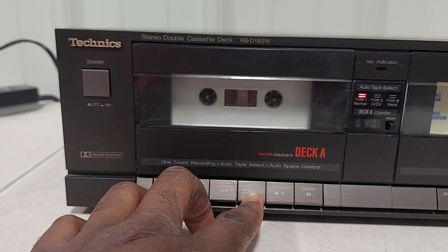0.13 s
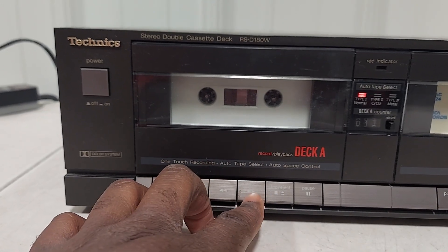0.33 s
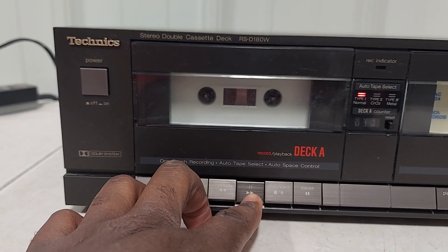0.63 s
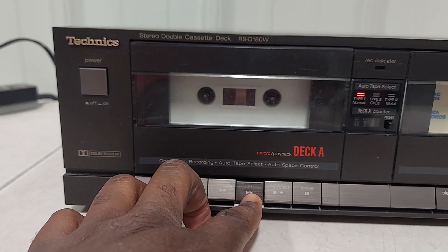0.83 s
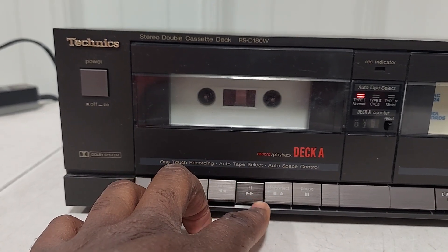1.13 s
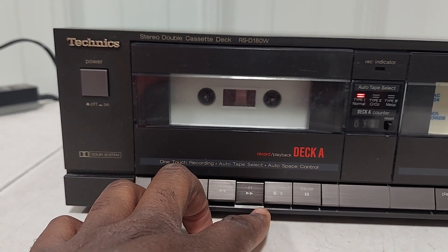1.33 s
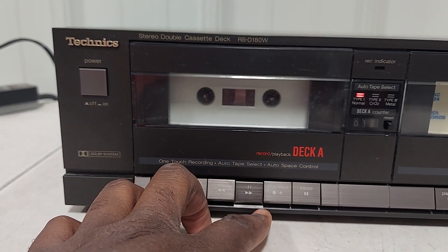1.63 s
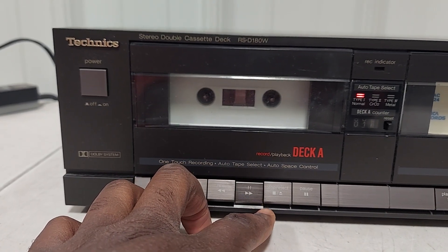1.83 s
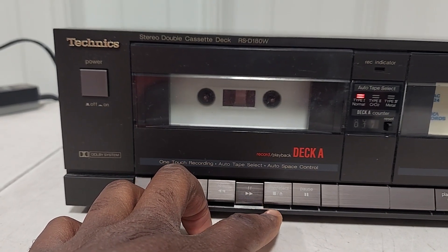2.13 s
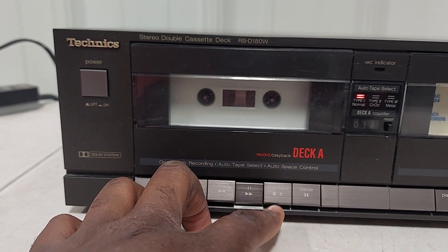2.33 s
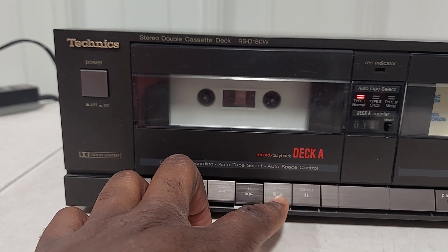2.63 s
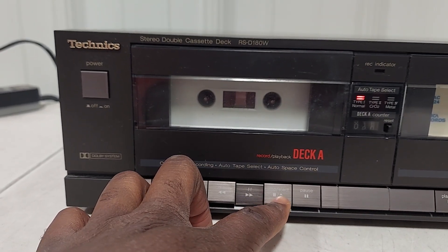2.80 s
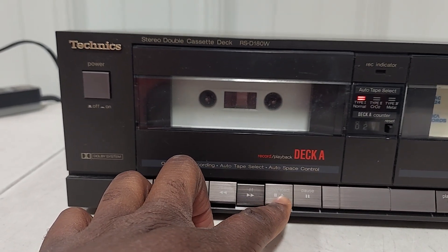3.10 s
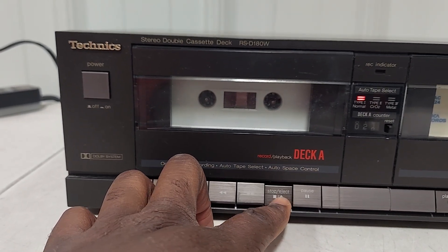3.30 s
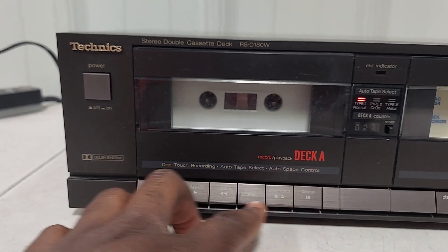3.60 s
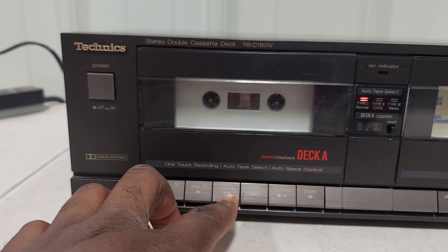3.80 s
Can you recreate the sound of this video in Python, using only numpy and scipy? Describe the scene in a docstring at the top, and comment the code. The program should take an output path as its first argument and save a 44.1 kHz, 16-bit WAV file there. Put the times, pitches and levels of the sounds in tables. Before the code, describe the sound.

A cassette deck on a table, heard close in a small room. Faint rumble and hum until clustered plastic key clicks at 0.5-0.72 s. From 0.65 s gears whir low and grainy, fluttering about seven times a second, with faint tape hiss; a small tick at 2.4 s. At 3.33 s a loud sharp latch crack stops it; a softer spring-back clack at 3.52 s, then finger rubbing until 3.8 s.

```python
"""On a table in a small room, a cassette deck is worked close to a two-port microphone.
A finger pushes the wind key, heard as short noise cracks with ringing parts; the stop key trips the latch
with a sharp crack and springs back. In between, gears whir as wavering tones, with chassis rattle and
tape hiss made of shaped noise. The room answers the clicks with a decaying noise echo.
Underneath lie low rumble, mains hum, a finger sliding over the keys and microphone hiss."""
import sys
import numpy as np
from scipy import signal
from scipy.fft import rfft, irfft, next_fast_len
from scipy.io import wavfile
from scipy.ndimage import map_coordinates

SR = 44100
rng = np.random.default_rng(int(sys.argv[2]) if len(sys.argv) > 2 else 0)


def master_out(mix):
    """Clip the mix to full scale and print it as 16-bit PCM to the path in sys.argv[1]."""
    frames = np.transpose(np.atleast_2d(mix))
    ceiling = np.clip(frames, -1, 1)
    pcm = np.round(ceiling * 32767).astype(np.int16)
    wavfile.write(sys.argv[1], SR, pcm)


def decibels_to_gain(level_db):
    """Convert a level in decibels to a linear amplitude gain (20 dB per decade)."""
    exponent = np.asarray(level_db, float) / 20
    return 10 ** exponent


N = 174195
T = np.arange(N) / SR


def unit(x):
    """Scale to rms 1."""
    return x / np.sqrt(np.mean(x ** 2) + 1e-20)


def along(points, hz):
    """Read a value between (frequency, value) points on a log frequency axis."""
    f, value = np.transpose(points)
    return np.interp(np.log(hz + 1), np.log(f + 1), value)


def closed(points):
    """Gain of a noise spectrum, silent well outside its end points."""
    return lambda hz: decibels_to_gain(along(points, hz)) * (hz >= points[0][0] / 2) * (hz <= points[-1][0] + 100)


def curve(rows):
    """Turn (time, value) rows into one value per sample."""
    return np.interp(T, *np.transpose(rows))


def wobble(rate):
    """A smooth random curve through `rate` random values a second."""
    knots = rng.standard_normal(int(N * rate / SR) + 4)
    return map_coordinates(knots, [T * rate])


def filtered(x, response):
    """Multiply the spectrum of x by a gain that depends on frequency."""
    size = next_fast_len(x.shape[-1] + 8192)
    spectrum = rfft(x, size) * response(np.fft.rfftfreq(size, 1 / SR))
    return irfft(spectrum, size)[..., :x.shape[-1]]


def peaks(table):
    """Gain of steep resonances: each is applied three times, then their powers add."""
    def power(f, center, width, db):
        once = (f * width) ** 2 / ((center * center - f * f) ** 2 + (f * width) ** 2)
        return decibels_to_gain(2 * db) * once ** 3
    return lambda f: np.sqrt(sum(power(f, *row) for row in table))


# How alike left and right are: (frequency [Hz], likeness [-1 to 1])
LIKENESS = [(60, 0.95), (180, 0.95), (550, 0.73), (1650, -0.031), (4970, -0.1), (15000, 0.096)]


def noise(gain, size=N):
    """Stereo noise of rms 1, alike in the bass and nearly unrelated in the treble."""
    def spread(hz):
        angle = np.arccos(np.clip(along(LIKENESS, hz), -1, 1)) / 2
        return gain(hz) * np.array([np.cos(angle), np.sin(angle)])
    mid, side = filtered(rng.standard_normal((2, size)), spread)
    return unit(np.array([mid + side, mid - side]))


def ring(modes, t):
    """Struck parts ring as fading sines; the two ports part in phase towards the treble."""
    out = 0
    for hz, db, t60 in modes:
        level = decibels_to_gain(db + rng.normal(0, 3.1) - 60 * t / t60)
        phase = rng.normal(0, hz / 3000, (2, 1))
        out = out + level * np.sin(2 * np.pi * hz * t + phase)
    return out


def chatter(size):
    """Loose parts tick unevenly inside a contact: a spiky gain of rms 1, each tick dying in a few ms."""
    ticks_per_s, tick_spread_db = 1100, 5.5
    ticks = (rng.random(size) < ticks_per_s / SR) * decibels_to_gain(tick_spread_db * rng.standard_normal(size))
    return unit(0.5 + signal.lfilter([1], [1, -0.975], ticks))


# Contacts in the key linkage: (time [s], level [dB], build-up [s], time to fade 60 dB [s],
# body thud over the crack [dB], top frequency of crack and panel [Hz])
CONTACTS = [(0.519, -69.5, 0.0012, 0.31, 8, 2930), (0.649, -44, 0.0053, 0.11, -21, 15600),
            (0.655, -38.5, .002, 0.076, 2, 15100), (0.664, -39, 0.0031, 0.058, 5.5, 14300),
            (.704, -40.5, 0.0019, 0.039, -3, 8100), (0.7185, -31.5, 0.00078, 0.049, -2, 14800),
            (2.403, -48.5, 0.003, 0.061, 5.5, 8350), (2.466, -68, 0.0021, .03, -10, 6000),
            (3.252, -59.5, .003, 0.052, -8.5, 7020), (3.3252, -27.5, 0.00062, 0.042, -4, 14870),
            (3.3296, -10.5, .0015, 0.048, -7, 16000), (3.338, -29, 0.0019, 0.051, -5, 6070),
            (3.347, -32.5, .002, 0.14, -1.5, 6870), (3.514, -39, .004, 0.091, -22, 7850),
            (3.519, -28.5, 0.0037, 0.038, -2.5, 11780), (3.945, -59, 0.0036, 0.046, -12, 2920)]
# Colour of the crack: (frequency [Hz], relative level [dB per Hz])
CRACK_COLOUR = [(300, -28.5), (700, -10.5), (2300, -10.5), (3000, -12), (4800, -16), (5500, -10.5),
                (6700, -14.5), (9500, -15), (11000, -18), (12300, -10), (14500, -14), (16700, -32.5)]
# Ringing front panel and levers: (frequency [Hz], relative level [dB], time to fade 60 dB [s])
PANEL_MODES = [(1671, -8.5, 0.069), (1937, -13.5, 0.075), (2329, -14, 0.12), (2756, -12, 0.12),
               (2950, -11.5, 0.097), (5600, -2, 0.012), (7300, -8, 0.047), (7620, -7.5, 0.031),
               (12300, -4.5, 0.04)]
# Ringing case of the deck: (frequency [Hz], relative level [dB], time to fade 60 dB [s])
CASE_MODES = [(543.6, -17.5, 0.22), (672.3, 1, 0.052), (910, -3.5, 0.053), (989, -17.5, 0.18)]


def add_contacts(out, t):
    """Each contact builds up as a grainy scrape, cracks, and rings the panel and the case."""
    size, panel_db = len(t), -8
    for at, db, rise, t60, thud_db, top_hz in CONTACTS:
        late, up = np.clip(t - rise, 0, None), np.clip(t / rise, 0, 1)
        crack = up ** 0.39 * decibels_to_gain(-60 * late / t60) * chatter(size) * noise(closed(CRACK_COLOUR), size)
        panel = decibels_to_gain(panel_db) * (late > 0) * ring(PANEL_MODES, late)
        bright = filtered(crack + panel, lambda hz: 1 / np.sqrt(1 + (hz / top_hz) ** 6))
        thud = decibels_to_gain(thud_db) * up * ring(CASE_MODES, t)
        # the scrape starts early, so that the crack lands on time
        out[:, round((at - rise) * SR):][:, :size] += decibels_to_gain(db) * (bright + thud)


# Table thumps under the key presses: (time [s], level [dB], lowest frequency stirred [Hz])
THUMP_TIMES = [(0.664, -35, 257), (.722, -41, 97), (3.332, -33.5, 101), (3.522, -35, 60),
               (3.612, -48.5, 69.9)]
# Ringing table top: (frequency [Hz], relative level [dB], time to fade 60 dB [s])
TABLE_MODES = [(81.3, -6, .3), (134.7, -2.5, .35), (219.3, -5.5, 0.35), (272.8, -3.5, 0.2),
               (372.3, -9.5, .25), (476.3, -9.5, 0.11)]


def add_thumps(out, t):
    """A press rings the table and makes it shudder as noise around the same frequencies."""
    size = len(t)
    blurred = peaks([(hz, 60, level) for hz, level, _ in TABLE_MODES])
    for at, db, low_hz in THUMP_TIMES:
        shudder = decibels_to_gain(-2 - 60 * t / 0.39) * noise(blurred, size)
        thump = filtered(ring(TABLE_MODES, t) + shudder, lambda hz: hz ** 4 / (hz ** 4 + low_hz ** 4))
        soft_start = 1 - np.exp(-t / 0.006)
        out[:, round(at * SR):][:, :size] += decibels_to_gain(db) * soft_start * thump


# Return spring of the key: (frequency [Hz], level [dB], time to fade 60 dB [s])
SPRING_MODES = [(584, -46, 0.28)]


def add_spring(out, t):
    """The key's return spring sings after release, as a fading tone."""
    spring_s, rise_s = 3.545, 0.016
    out[:, round(spring_s * SR):][:, :len(t)] += np.clip(t / rise_s, 0, 1) * ring(SPRING_MODES, t)


def keys():
    """The keys knock part on part, thump the table and spring back."""
    out = np.zeros((2, N + SR))
    t = np.arange(SR // 3) / SR
    add_contacts(out, t)
    add_thumps(out, t)
    add_spring(out, t)
    return out[:, :N]


# How fast the room's answer dies: (frequency [Hz], time to fade 60 dB [s])
ROOM_DECAY = [(300, 0.13), (3000, 0.6), (7000, 0.43), (14000, 0.29)]


def room(x):
    """The room answers with noise in which each frequency dies at its own speed."""
    room_db = -16.5
    _, t, grid = signal.stft(rng.standard_normal((2, SR // 2)), SR, nperseg=256)
    hz = np.fft.rfftfreq(256, 1 / SR)
    fade = decibels_to_gain(-60 * t / along(ROOM_DECAY, hz)[:, None])
    tail = signal.istft(grid * fade, SR, nperseg=256)[1]
    tail = tail / np.linalg.norm(tail[0])
    delayed = np.pad(x, ((0, 0), (300, 0)))  # 300 samples, about 7 ms
    return decibels_to_gain(room_db) * signal.fftconvolve(delayed, tail, axes=1)[:, :N]


# Gear tones: (frequency [Hz], level before swell and flutter [dB])
GEAR_TONES = [(334, -67), (682, -60.5), (1015, -69.5)]


def gear_whine():
    """An off-centre gear swings the pitch and loudness of its tones once a turn."""
    gear_hz, fastest_s, swell_db = 7.36, 2.104, 3
    swing, jitter, jitters_per_s = 0.026, 0.012, 35  # swing and jitter are shares of the pitch
    flutter_db, flutters_per_s = 4.5, 18
    gear = np.cos(2 * np.pi * gear_hz * (T - fastest_s))
    warped_time = np.cumsum(1 + swing * gear + jitter * wobble(jitters_per_s)) / SR
    whine = 0
    for hz, db in GEAR_TONES:
        level = decibels_to_gain(db + swell_db * gear + flutter_db * wobble(flutters_per_s))
        whine = whine + level * np.sin(2 * np.pi * hz * warped_time)
    return whine


def grainy_level(db, waver_db):
    """A level that wavers slowly and flickers quickly, by chance."""
    grain_db, grains_per_s = 2, 110
    return decibels_to_gain(db + waver_db * wobble(12) + grain_db * wobble(grains_per_s))


# Chassis resonances: (frequency [Hz], width of a single pass [Hz], relative level [dB])
CHASSIS_PEAKS = [(143.6, 13.7, 5), (207.7, 55, -6.5), (320.7, 65, -2), (549, 283, -17), (635, 50, -8),
                 (696, 62, -8.5), (899, 46, -11.5), (983, 190, -13), (1378, 420, -23.5), (1552, 310, -19.5),
                 (2543, 550, -25), (3040, 67, -23.5), (3660, 220, -26)]


def chassis_rattle():
    """The gears whir through the chassis: grainy noise shaped by its resonances."""
    return grainy_level(-52, 1.0) * noise(peaks(CHASSIS_PEAKS))


# Colour of tape and bearing hiss: (frequency [Hz], relative level [dB per Hz])
TAPE_COLOUR = [(1060, -49.5), (1800, -10), (2640, -3.5), (3400, -4), (4390, -8), (5260, -7.5), (7780, -7.5),
               (9410, -17.5), (11100, -9.5), (13700, -10), (15800, -17.5)]


def tape_hiss():
    """Tape and bearings hiss as grainy noise."""
    return grainy_level(-65.5, 0.57) * noise(closed(TAPE_COLOUR))


def winding():
    """Whine, rattle and hiss fade in as the gears engage and fade out at the stop."""
    start_s, fade_in_s, stop_s, fade_out_s = 0.64, 0.018, 3.33, 0.03
    running = np.clip((T - start_s) / fade_in_s, 0, 1) * np.clip(1 - (T - stop_s) / fade_out_s, 0, 1)
    return running * (gear_whine() + chassis_rattle() + tape_hiss())


# Colour of the finger's rub: (frequency [Hz], relative level [dB per Hz])
SLIDE_COLOUR = [(410, -30), (700, -1.5), (957, -14), (1190, -3.5), (2040, -10.5), (2610, -3), (3670, -9.5),
                (5280, -0.5), (12800, -14.5), (15800, -22)]
# Strength of the rub: (time [s], level [dB], extra treble [dB])
SLIDE_STRENGTH = [(0, -82, 6), (.1, -79, 0.5), (.3, -88, 0), (.48, -111, 0), (.56, -82, -1),
                  (0.635, -67.5, -4), (.7, -96, 0), (3.45, -87, 0), (3.56, -51.5, -34), (3.62, -53, -6),
                  (3.69, -57, 4.5), (3.765, -63, 3), (3.8, -76, 2), (3.881, -86, 1), (3.918, -78, 5.5),
                  (3.95, -73.5, 2)]


def sliding_finger():
    """Skin rubs over the keys: noise whose loudness and treble change over time."""
    split_hz = 4600
    rows, rub = np.array(SLIDE_STRENGTH), noise(closed(SLIDE_COLOUR))
    dull = filtered(rub, lambda hz: 1 / (1 + (hz / split_hz) ** 4))
    treble = decibels_to_gain(curve(rows[:, ::2])) * (rub - dull)
    return decibels_to_gain(curve(rows[:, :2]) + 3.0 * wobble(20)) * (dull + treble)


# Colour of the broad rumble: (frequency [Hz], relative level [dB per Hz])
RUMBLE_COLOUR = [(15, -64.5), (25, -33.5), (43, -13.5), (65, -2), (82, -15), (107, -6), (128, -2),
                 (140, -4.5), (210, -4), (395, -20.5), (900, -51), (1170, -90.5), (1980, -120)]
# Wavering hums in the rumble: (frequency [Hz], width of a single pass [Hz], relative level [dB])
RUMBLE_HUMS = [(121.5, 12, -2), (202.7, 11, -10.5), (223.1, 18, -14)]
# Gain on the blend of rumble and hums: (time [s], level [dB])
RUMBLE_STRENGTH = [(0.0, -56), (0.53, -58.5), (0.76, -50.5), (1.83, -51.5), (2.11, -53), (2.79, -52),
                   (3.26, -53.5), (3.44, -44), (3.95, -54)]


def room_rumble():
    """Low noise blended with narrow noise bands that sound like wavering hums."""
    broad = noise(lambda hz: decibels_to_gain(along(RUMBLE_COLOUR, hz)))
    hums = noise(peaks(RUMBLE_HUMS))
    return decibels_to_gain(curve(RUMBLE_STRENGTH) + 0.52 * wobble(4.96)) * (0.74 * broad + 0.53 * hums)


# Mains hum: (frequency [Hz], level before wavering [dB])
MAINS_TONES = [(58, -65.5), (120, -63)]


def mains_hum():
    """Steady low tones that waver a little in level and phase."""
    waver_db, waver_rad = 2.5, 1.1
    hum = 0
    for hz, db in MAINS_TONES:
        level = decibels_to_gain(db + waver_db * wobble(11))
        hum = hum + level * np.sin(2 * np.pi * hz * T + waver_rad * wobble(15))
    return hum


# Colour of the microphone's hiss: (frequency [Hz], relative level [dB per Hz])
MICROPHONE_COLOUR = [(400, -6), (1000, 1), (2500, -0.5), (4400, -12), (4900, -6.5), (8700, 2.5),
                     (9200, -9.5), (15800, -7)]


def microphone_hiss():
    """The microphone's own steady noise."""
    return decibels_to_gain(-83) * noise(closed(MICROPHONE_COLOUR))


def scene():
    """Keys and the room's answer to them, winding, then the background."""
    hits = keys()
    background = sliding_finger() + room_rumble() + mains_hum() + microphone_hiss()
    return hits + room(hits) + winding() + background


def roll_off(x):
    """The treble ends steeply here."""
    return signal.sosfilt(signal.butter(12, 16890, fs=SR, output="sos"), x)


# Colour difference of the ports: (frequency [Hz], left over right [dB])
PORT_TILT = [(60, -2.5), (180, -1.5), (550, 2), (1100, -0.5), (2200, 0.5), (4500, -6), (8000, 1),
             (14000, -1)]


def record(dry):
    """The microphone input saturates softly; its ports differ in colour and stop at a top frequency."""
    ceiling, top_hz = 0.93, 16500
    saturated = dry / (1 + (dry / ceiling) ** 4) ** (1 / 4)

    def ports(hz):
        tilt = decibels_to_gain(np.outer([0.5, -0.5], along(PORT_TILT, hz)))
        return tilt / (1 + (hz / top_hz) ** 60)
    return roll_off(filtered(saturated, ports))


dry = scene()
out = record(dry)
master_out(out)
```